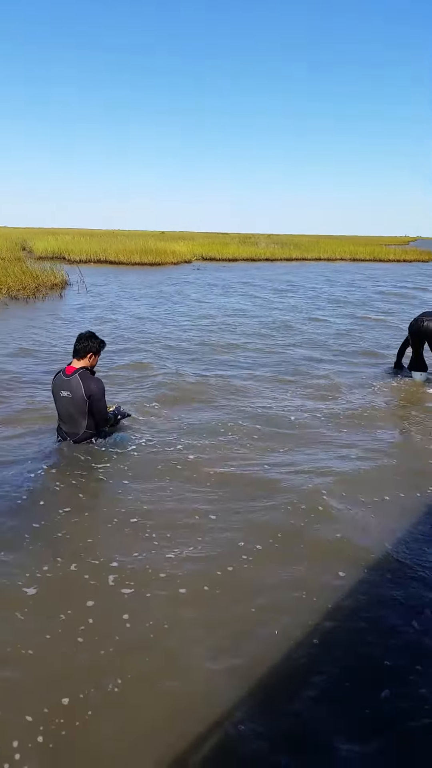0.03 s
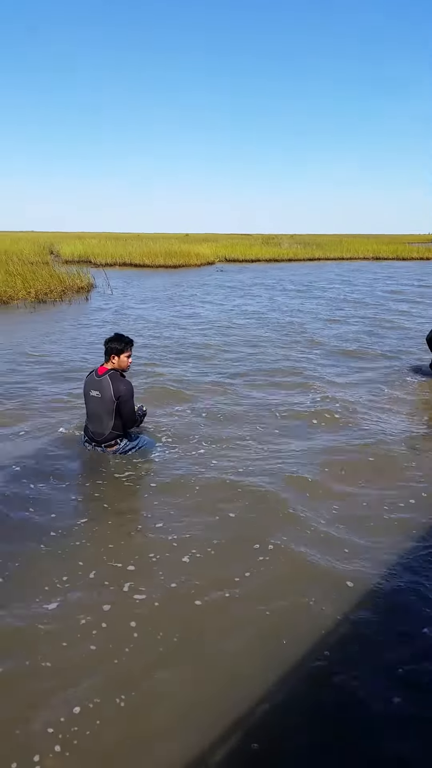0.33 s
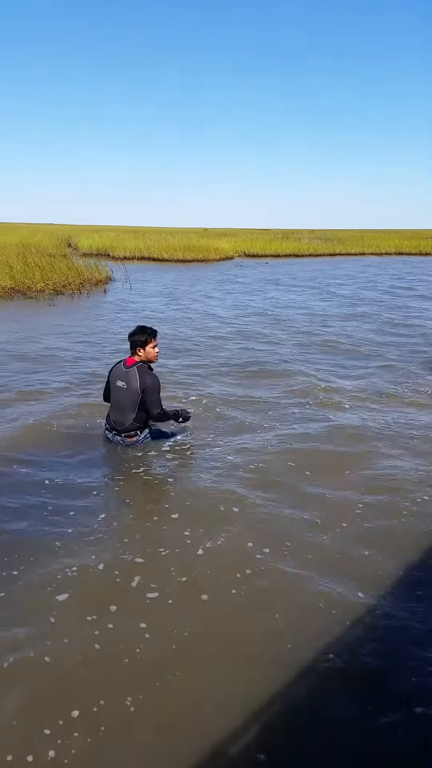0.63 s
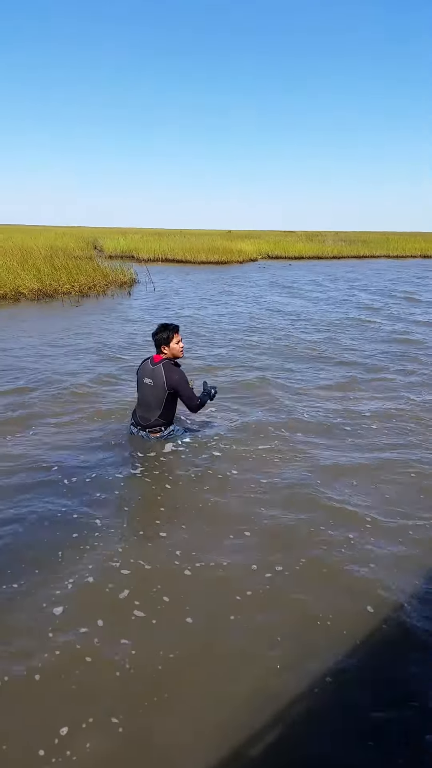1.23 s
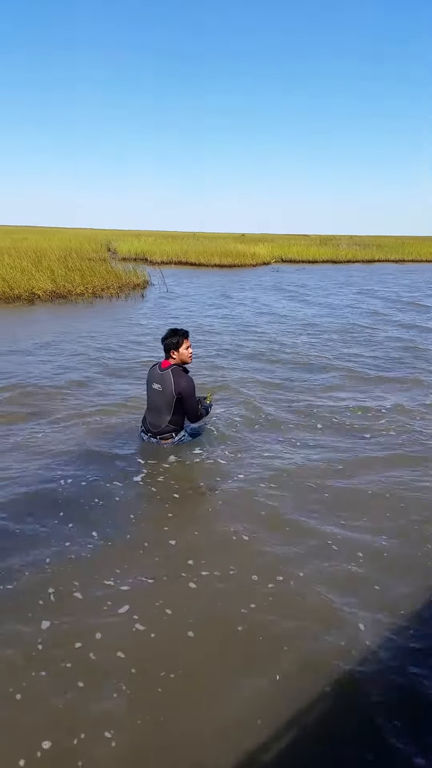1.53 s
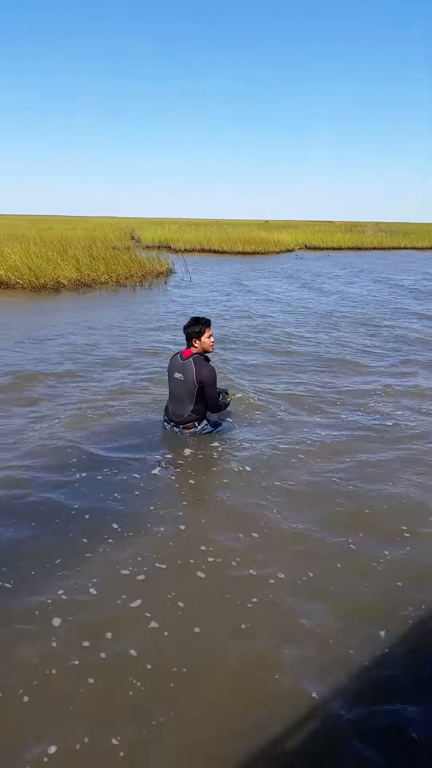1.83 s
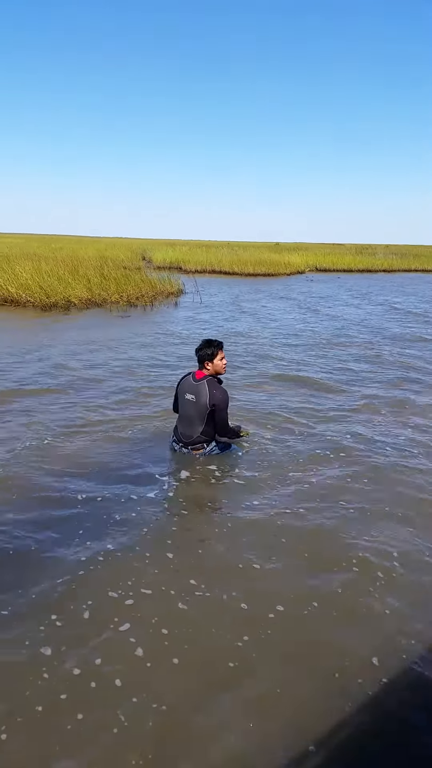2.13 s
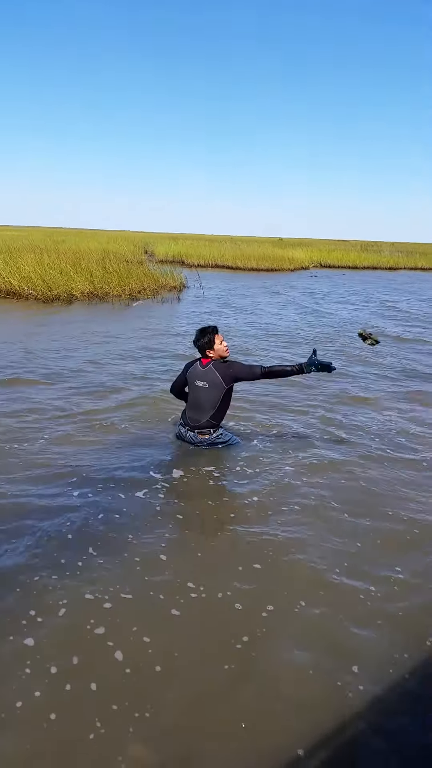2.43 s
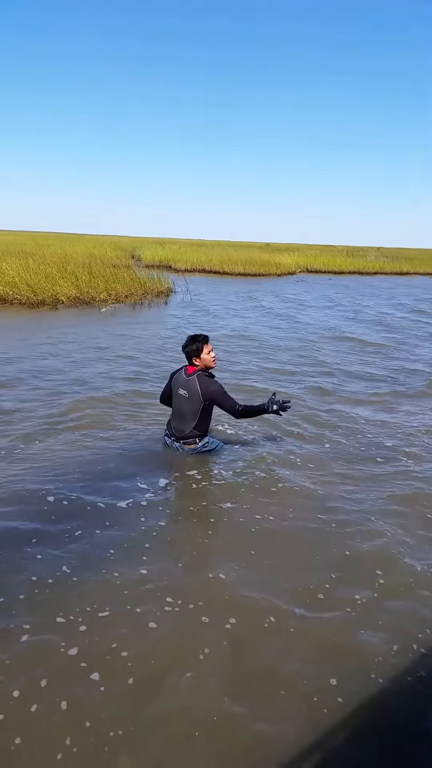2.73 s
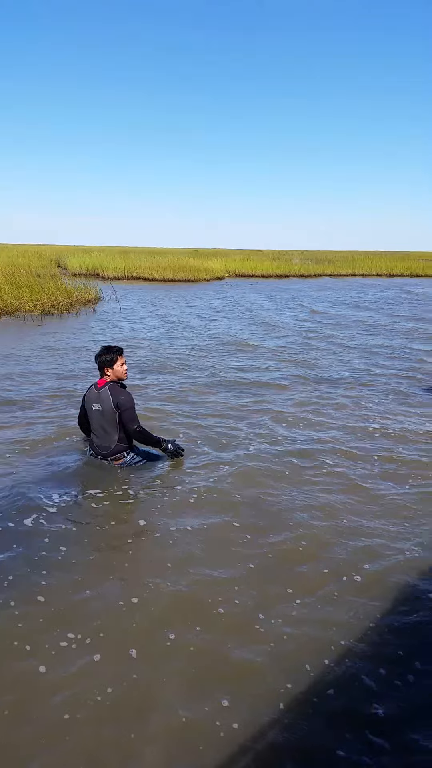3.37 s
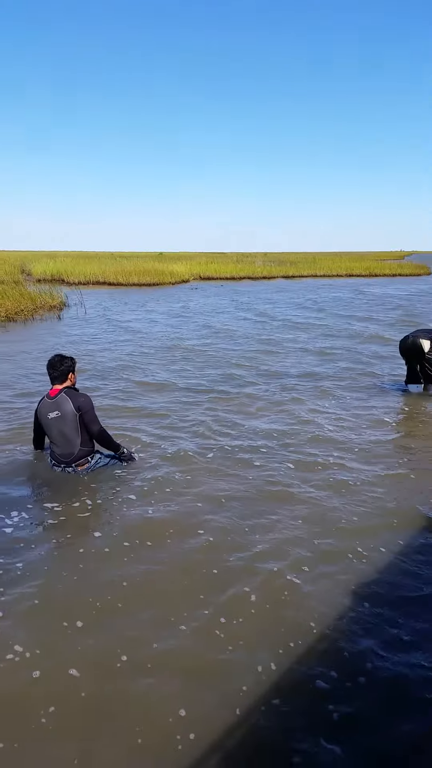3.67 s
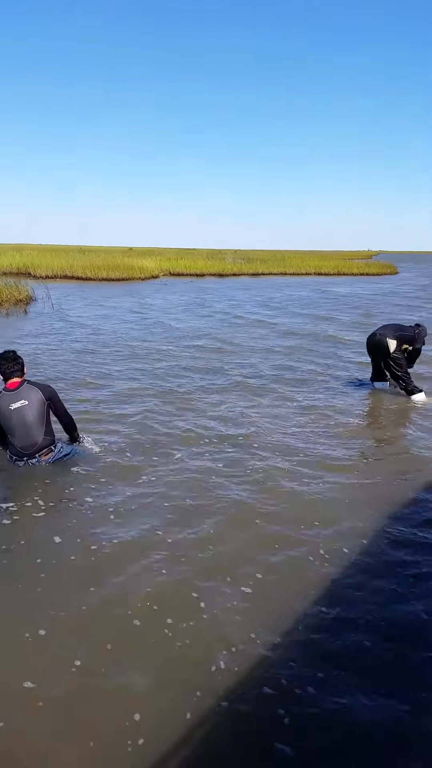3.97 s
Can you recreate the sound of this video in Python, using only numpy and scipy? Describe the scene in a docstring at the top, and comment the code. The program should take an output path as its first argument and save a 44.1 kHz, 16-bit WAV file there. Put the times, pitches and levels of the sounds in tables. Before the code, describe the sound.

Shell clumps land in a boat with sharp knocks, over gusting wind and faint water.

```python
"""Clumps of shells land in a boat in a windy marsh, heard from on board.
From the start, wind buffets two microphone ports and water sloshes over a faint hiss.
Single shells clink; from 0.2 s clumps knock, each a cluster of contacts that rings the hull.
Shell edges scrape at 0.8-1.5 s, with a splash at 1.1 s. The heaviest clump lands at 1.6 s;
knocks and clinks go on until 3.8 s."""
import sys
import numpy as np
from scipy import signal
from scipy.fft import rfft, irfft
from scipy.io import wavfile
from scipy.ndimage import uniform_filter1d, minimum_filter1d

SR = 44100
rng = np.random.default_rng(int(sys.argv[2]) if len(sys.argv) > 2 else 0)


def waveform_to_disk(signal):
    """Save audio, clipped to [-1, 1], as 16-bit WAV at the path in sys.argv[1]."""
    frames = np.transpose(np.atleast_2d(signal))
    scaled = np.clip(frames, -1, 1) * 32767
    samples = np.round(scaled).astype(np.int16)
    wavfile.write(sys.argv[1], SR, samples)


N = 176400
T = np.arange(N) / SR

# Table levels are relative. Pan is left minus right.
# wind strength: t/s, level/dB
GUSTS = [(0.0, -26.5), (0.02, -15.5), (0.15, -22.5), (0.2, -16.5), (0.44, -15.5), (0.48, -25.5),
         (0.59, -16), (0.63, -37), (0.69, -18.5), (0.91, -16), (1.09, -18), (1.1, -15.5), (1.41, -17),
         (1.47, -18), (1.5, -19), (2.03, -20.5), (2.14, -17), (2.16, -28.5), (2.22, -16.5), (2.26, -26.5),
         (2.36, -15), (2.43, -26), (2.49, -27), (2.55, -15), (2.62, -19), (2.71, -16.5), (2.73, -24.5),
         (2.78, -17), (2.9, -25.5), (2.97, -14.5), (3.0, -25), (3.07, -15.5), (3.27, -16.5), (3.34, -20),
         (3.83, -17), (4.0, -17)]
# wind side, scaled by PAN_SHARE: t/s, pan/dB
WIND_PAN = [(0.0, 6.5), (0.15, 10.5), (0.21, -15.0), (0.26, 5.5), (0.98, -7), (1.83, 7.5), (2.08, -10),
            (2.15, 15.5), (2.57, -5.5), (2.86, 19.5), (2.91, 5.5), (3.54, -2.5), (3.62, 15), (3.79, -9.5),
            (3.85, 9), (4.0, -3.5)]
# wind rumble: f/Hz, level/dB
RUMBLE_SPECTRUM = [(10,-1.5),(25,-12.5),(45,-3.5),(80,0),(130,0),(200,-4),(300,-11.5),(450,-19.5),(700,-37),(1200,-46.5),(2500,-68),(5000,-84),(15000,-92)]
# wind flutter: f/Hz, level/dB
FLUTTER_SPECTRUM = [(30,-7.5),(150,-1),(300,3),(500,-4.5),(800,-12),(1300,-24.5),(2200,-38),(4000,-66),(8000,-69.5)]
# water sloshes: t/s, level/dB
SLOSHES = [(0,-53.5),(.06,-60),(.24,-57.5),(.3,-55),(.42,-59),(.52,-53.5),(.6,-46.5),(.7,-42.5),(.8,-46.5),(.9,-51.5),(1.03,-52.5),(1.075,-37),(1.1,-37.5),(1.15,-58),(1.22,-44),(1.33,-45.5),(1.41,-51),(1.48,-43),(1.56,-52),(1.62,-52),(1.9,-50.5),(1.96,-55.5),(2.04,-46),(2.17,-64),(2.34,-47.5),(2.48,-62.5),(2.75,-51),(2.9,-66),(3.2,-74),(3.32,-39),(3.48,-59),(3.54,-50.5),(3.66,-63.5),(3.87,-51.5),(4,-64)]
# splashing: f/Hz, level/dB
SPLASH_SPECTRUM = [(100,-16.5),(500,3),(1200,10.5),(2200,7),(3500,-1.5),(5000,-7),(7500,-9),(9300,-28.5),(12000,-7),(14500,-32.5),(16000,-28.5)]
# marsh hiss: f/Hz, level/dB
HISS_SPECTRUM = [(100,18.5),(1500,2),(3000,-6.5),(6000,-3.5),(9300,-29),(12000,-10),(15000,-9.5)]
# eddies at the ports: t/s, level/dB, pan/dB, f/Hz
EDDY_POPS = [(.043,-16.5,32,316),(.151,-17.5,44,364),(.183,-19,-19,403),(0.276,-17,9,400),(0.28,-12,4,330),(.304,-17.5,-15,380),(.313,-20,20,490),(.389,-15,18,324),
             (.577,-21,16,380),(0.831,-17,25,490),(.995,-15.5,-32,486),(1.003,-20,-28,710),(1.115,-13,-15,363),(1.175,-14,28,362),
             (1.225,-18,28,390),(1.441,-19,20,535),(1.992,-24,-18,470),(2.069,-19,-13,430),(2.107,-23.5,21,358),(2.522,-20,-31,393),
             (2.77,-21.5,30,357),(2.802,-15.5,35,480),(2.811,-16.5,36.5,360),(2.886,-12.5,40,324),(3.076,-21,17,366),(3.193,-10,19.5,348),(3.213,-24,27,410),
             (3.307,-18.5,7,485),(3.594,-18.5,30,557),(3.634,-19,27,460),(3.72,-20,28,356),(3.871,-18,10,600),(3.876,-12.5,12,555),(3.919,-18,27,417)]
# single shells tapping: t/s, level/dB, f/Hz
SHELL_TAPS = [(0.088,-55.5,6950),(0.597,-13.5,2100),(0.6064,-19,2090),(.614,-39,3630),(0.6157,-29,12000),(.621,-8,2270),(0.6206,-23,6180),
              (1.843,-28,7820),(2.632,-26,3440),(3.235,-24.5,1360),(3.238,-20,2010),(3.772,-32,1680),(2.3555,-44,5330),(3.3625,-24.5,3340),(3.3627,-16.5,5000),(3.536,-43,4130)]
# tapped shell: f ratio, level/dB, t60/s
CLINK_MODES = [(1.002,-1,0.023),(1.209,-14.5,0.019),(1.618,-17.5,0.013),(2.601,-16,0.013)]
# hull decay: f/Hz, t60/s
HULL_DECAY = [(200,0.18),(800,0.16),(2200,0.12),(5000,0.15),(12000,0.18)]
# clumps landing: t/s, thud/dB, crack/dB, treble/dB, crumble/s, pan/dB, ring f/Hz, ring lift/dB
LANDINGS = [(.222,-60,-48.5,-46,.001,-3,6400,10),(0.243,-65,-55,-42,.0015,-4,8200,6),(0.281,-26.5,-46,-51,.0025,2,7500,14),(0.464,-55,-69,-51,.002,5,1700,9),
            (.597,-44.5,-35,-41,.002,14,2160,8),(.613,-56,-35,-22.5,0.0015,-3.5,2210,9),(.676,-34,-41.5,-49,0.0073,4,2500,4.5),(1.298,-24,-39.5,-46,.005,-0.5,1850,2.5),
            (1.497,-22.5,-40,-36,0.016,3,3400,8.5),(1.564,-33.5,-40.5,-38.5,0.005,1.5,3800,2),(1.634,-13,-27,-25.5,0.0066,1,808,2.5),(1.752,-41.5,-38,-40.5,0.0059,-1,3400,-7.5),
            (1.828,-31,-34,-32.5,0.0022,-0.5,1080,12),(1.843,-41,-34,-32.5,.003,-2,6150,9),(1.861,-22,-31,-47,0.0084,1,1540,2),(1.973,-44,-47,-45.5,.002,-1,1850,2.5),
            (2.214,-40,-49.5,-54.5,.005,-1,8200,10.5),(2.254,-35.5,-33,-33,0.008,0.5,2200,-10.5),(2.282,-35,-39.5,-38.5,.014,-1,3400,0),(2.314,-40,-49.5,-42.5,.002,0,3900,9),
            (2.602,-35,-40.5,-55,.006,2,1800,-3),(2.631,-27,-35.5,-33.5,0.0045,-0.5,910,11),(2.672,-30,-41,-49,0.0037,0.5,2760,2.5),(2.988,-20,-32.5,-33,0.008,2,2137,3),(3.231,-25,-27.5,-31,.008,1,1884,8),
            (3.335,-29,-42,-45,0.0072,0.5,2600,3.5),(3.361,-33.5,-29.5,-25,0.0026,2.5,1050,8.5),(3.374,-30.5,-41,-29,0.0078,-14,11800,1),(3.511,-58,-45,-45.5,0.0027,-1,3900,-2),(3.769,-26,-32,-41.5,0.0068,1,7500,15)]
# clump impact: f/Hz, level/dB
CLUMP_SPECTRUM = [(60,-16),(150,1),(260,10),(480,4.5),(830,2.5),(1300,0.5),(2000,4),(2800,-3),(3600,-9),(5000,-12.5),(7000,-17.5),(9300,-29),(11000,-22),(12500,-19.5),(14500,-33),(16000,-23)]
# hull resonances: f/Hz, width/Hz, lift/dB
HULL_MODES = [(260,87,1),(432,77,5.5),(513,30,1),(842,69,4.5),(1135,170,5.5),(1300,82,1.5),(1920,170,0.5),(2120,80,-0.5),(3460,110,7),(3750,70,9.5)]
# shells scraping: t/s, length/s, level/dB, f/Hz
SHELL_SLIDES = [(0.829,0.026,-52.5,3500),(0.924,0.018,-53.5,3440),(1.05,0.042,-41.5,3270),(1.189,0.14,-56,3100),(1.335,0.03,-49,3530),(1.45,.05,-54.5,3500)]
# scraped shell: f ratio, level/dB
SLIDE_MODES = [(.75,-1),(1,2.5),(1.21,-6),(2.3,-16.5)]

RUMBLE_DB, FLUTTER_DB, FLUTTER_SLOPE, LUMP_DB, LUMP_HZ, PAN_SHARE = 2, -9, 1.98, 8, 60, 0.74
DROPS_PER_S, DROP_SPREAD_DB, RIGHT_DELAY_S = 1200, 6.5, 0.000272
HISS_DB, EDDY_DB, CLINK_TAIL_DB = -68.5, 9, -7
TAIL_RISE_S, TAIL_CORRELATION, LINGER_DB, LINGER_T60_S = 0.00043, 0.11, -44, 0.7
KNOCK_DB, DIRECT_DB, CONTACTS_PER_S = 3.5, -4, 700
THUD_HZ, CRACK_HZ, TREBLE_HZ = 566, 2470, 8500
RING_Q, SHARD_Q, SHARD_DB, SHARD_LOW_HZ, SHARD_HIGH_HZ = 10, 22, 7, 1214, 14000
RATTLE_PER_S, RATTLE_DECAY_S, RATTLE_DB = 160, 0.027, -10.5
SLIPS_PER_S, SCRAPE_Q, SCRAPE_TAIL_DB = 290, 6.8, 2.5
LIMITER_S, LOWPASS_HZ = 0.006, 14900


def amp(db):
    """Decibels to gain."""
    return 10 ** (np.asarray(db) / 20)


def unit_rms(x):
    """Scale to rms 1."""
    return x / np.sqrt(np.mean(x ** 2) + 1e-20)


def at_hz(points, hz):
    """Table value on a log-frequency axis."""
    f, value = np.transpose(points)
    return np.interp(np.log(hz + 1), np.log(f + 1), value)


def curve(points):
    """Table value at every sample."""
    return np.interp(T, *np.transpose(points))


def pan(db):
    """Constant-power left and right gains."""
    return unit_rms(amp([[db / 2], [-db / 2]]))


def add(mix, start_s, sound):
    """Mix in a stereo sound."""
    part = mix[:, max(round(start_s * SR), 0):][:, :sound.shape[1]]
    part += sound[:, :part.shape[1]]


def colour(x, spectrum):
    """Shape a steady sound by a spectrum; rms 1."""
    gain = amp(at_hz(spectrum, np.fft.rfftfreq(N, 1 / SR)))
    return unit_rms(irfft(rfft(x) * gain, N))


def min_phase(x, db):
    """Filter by a gain per bin, with no ringing ahead of the attack."""
    log_gain = np.log(amp(np.r_[db, db[-2:0:-1]]))
    response = np.exp(np.conj(signal.hilbert(log_gain)))
    return irfft(rfft(x) * response[:len(db)])


def ports(x):
    """Sound from the left reaches the right port later."""
    n = np.arange(x.shape[1])
    return np.array([x[0], np.interp(n - RIGHT_DELAY_S * SR, n, x[1], left=0)])


def bell(hz, centre_hz, width_hz):
    """One resonance peak, height 1."""
    return 1 / (1 + (2 * (hz - centre_hz) / width_hz) ** 2)


def decay(t, t60_s):
    """Exponential fall, 60 dB per t60_s."""
    return np.exp(-np.log(1000) * t / t60_s)


def ticks(per_s, size):
    """Random impulses of random strength."""
    return rng.standard_normal(size) * (rng.random(size) < per_s / SR)


def wind():
    """Rumble and lumpy flutter, independent at each port; gusts lift the flutter more."""
    gust_db = curve(GUSTS)
    low, mid, slow = rng.standard_normal((3, 2, N))
    rumble = colour(low, RUMBLE_SPECTRUM) * amp(gust_db + RUMBLE_DB)
    lumps = unit_rms(irfft(rfft(slow) * (np.fft.rfftfreq(N, 1 / SR) < LUMP_HZ), N))
    flutter = colour(mid * amp(LUMP_DB * np.minimum(lumps, 2)), FLUTTER_SPECTRUM)
    flutter_db = gust_db.mean() + FLUTTER_SLOPE * (gust_db - gust_db.mean()) + FLUTTER_DB
    lean = amp(PAN_SHARE * curve(WIND_PAN) * np.array([[.5], [-.5]]))
    return lean * (rumble + flutter * amp(flutter_db))


def water():
    """Dense droplets over a wash, rising with each slosh."""
    drops = ticks(DROPS_PER_S, N) * amp(DROP_SPREAD_DB * np.minimum(rng.exponential(1, N), 4))
    spray = ports(np.array([unit_rms(drops)] * 2))
    wash = 2 * rng.standard_normal((2, N))
    return colour(spray + wash, SPLASH_SPECTRUM) * amp(curve(SLOSHES))


def marsh_hiss():
    """Faint steady background noise."""
    return amp(HISS_DB) * colour(rng.standard_normal((2, N)), HISS_SPECTRUM)


def eddies():
    """Eddies hit a port as single dull pops; smaller ones sound higher."""
    out, lead = np.zeros((2, N)), SR // 50
    t = np.arange(-lead, lead) / SR
    for start_s, db, pan_db, hz in EDDY_POPS:
        phase = rng.uniform(0, 2 * np.pi, (2, 1))
        pulse = np.exp(1j * phase) / (1 - 1j * np.pi * hz * t) ** 3  # spectrum peaks at hz
        pop = pulse.real * np.hanning(len(t))
        add(out, start_s - lead / SR, amp(db + EDDY_DB) * pan(pan_db) * pop)
    return out


def clinks():
    """One shell taps another and rings briefly; the hull throws it back."""
    out, t = np.zeros((2, N)), T[:SR // 10]
    for start_s, db, hz in SHELL_TAPS:
        ring = sum(amp(mode_db) * decay(t, t60_s) * np.sin(2 * np.pi * hz * ratio * t)
                   for ratio, mode_db, t60_s in CLINK_MODES if hz * ratio < LOWPASS_HZ)
        add(out, start_s, amp(db) * ports(through_hull(ring, CLINK_TAIL_DB)))
    return out


def through_hull(x, tail_db):
    """Direct sound plus hull ringing, in stereo."""
    path = amp(tail_db) * hull_tail()
    path[:, 0] += 1
    return signal.fftconvolve(path, x[None], axes=1)


def hull_tail(size=32768):
    """Dense hull ringing with a faint longer echo; energy 1 per channel."""
    left, other = rng.standard_normal((2, size))
    right = TAIL_CORRELATION * left + np.sqrt(1 - TAIL_CORRELATION ** 2) * other
    hz, t, bins = signal.stft(np.array([left, right]), SR, nperseg=256)
    fade = decay(t, at_hz(HULL_DECAY, hz)[:, None]) + amp(LINGER_DB) * decay(t, LINGER_T60_S)
    tail = signal.istft(bins * fade, SR)[1][:, :size]
    rise = 1 - np.exp(-T[:size] / TAIL_RISE_S)
    return unit_rms(tail * rise) / np.sqrt(size)


def knocks(size=32768):
    """A clump strikes and rings hollow, its shards settle and rattle, and the hull rings on."""
    out, t, hz = np.zeros((2, N)), T[:size], np.fft.rfftfreq(size, 1 / SR)
    body_db = at_hz(CLUMP_SPECTRUM, hz) + sum(db * bell(hz, f, width) for f, width, db in HULL_MODES)
    for start_s, thud_db, crack_db, treble_db, crumble_s, pan_db, ring_hz, ring_db in LANDINGS:
        settle = (1 + t / crumble_s) * np.exp(-t / crumble_s)
        contacts = ticks(CONTACTS_PER_S, size) * settle
        contacts[0] = 1  # first strike
        contacts /= np.linalg.norm(contacts)
        swell = np.sqrt(np.cumsum(contacts ** 2))  # each contact feeds the hull
        tail = unit_rms(hull_tail() * swell) / np.sqrt(size)
        shard_hz = SHARD_LOW_HZ * (SHARD_HIGH_HZ / SHARD_LOW_HZ) ** rng.random(size=12)
        shards = sum(bell(hz, f, f / SHARD_Q) for f in shard_hz)
        tone_db = at_hz([(THUD_HZ, thud_db), (CRACK_HZ, crack_db), (TREBLE_HZ, treble_db)], hz)
        tone_db += ring_db * bell(hz, ring_hz, ring_hz / RING_Q) + SHARD_DB * np.minimum(shards, 1)
        rattle = unit_rms(ticks(RATTLE_PER_S, size) * np.exp(-t / RATTLE_DECAY_S)) / np.sqrt(size)
        impact = tail + amp(DIRECT_DB) * contacts + amp(RATTLE_DB) * rattle
        add(out, start_s, pan(pan_db) * ports(min_phase(impact, body_db + tone_db)))
    return out * amp(KNOCK_DB) * np.sqrt(SR / 10)


def scrapes(size=16384):
    """Rough shell edges slip in uneven catches that ring the shell."""
    out, t, hz = np.zeros((2, N)), T[:size], np.fft.rfftfreq(size, 1 / SR)
    for start_s, length_s, db, shell_hz in SHELL_SLIDES:
        slips = ticks(SLIPS_PER_S, size) * np.sin(np.pi * np.minimum(t / length_s, 1))
        shell_gain = sum(amp(mode_db) * bell(hz, shell_hz * ratio, shell_hz * ratio / SCRAPE_Q)
                         for ratio, mode_db in SLIDE_MODES)
        ring = min_phase(slips, 20 * np.log10(shell_gain))
        scrape = ports(through_hull(ring, SCRAPE_TAIL_DB)[:, :size])
        add(out, start_s, amp(db) * np.sqrt(length_s * SR / size) * unit_rms(scrape))
    return out


def scene():
    """Shells, water and wind over the marsh hiss."""
    return knocks() + clinks() + scrapes() + water() + wind() + eddies() + marsh_hiss()


def record(dry):
    """Smooth peak limiter at full scale, then a low-pass."""
    span = round(LIMITER_S * SR)
    gain = minimum_filter1d(1 / np.maximum(abs(dry).max(0), 1), 2 * span)
    gain = uniform_filter1d(uniform_filter1d(gain, span), span)
    limited = np.pad(dry * gain, ((0, 0), (255, 255)), "edge")
    lowpass = signal.firwin(511, LOWPASS_HZ, window=("kaiser", 9), fs=SR)
    return signal.oaconvolve(limited, lowpass[None], "valid")


dry = scene()
out = record(dry)
waveform_to_disk(out)
```